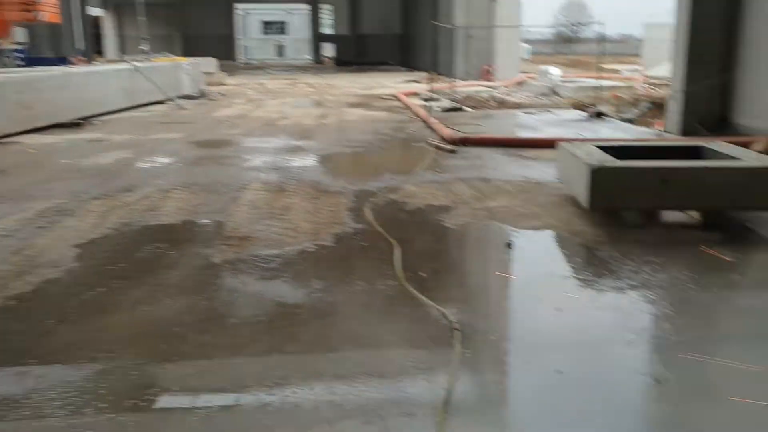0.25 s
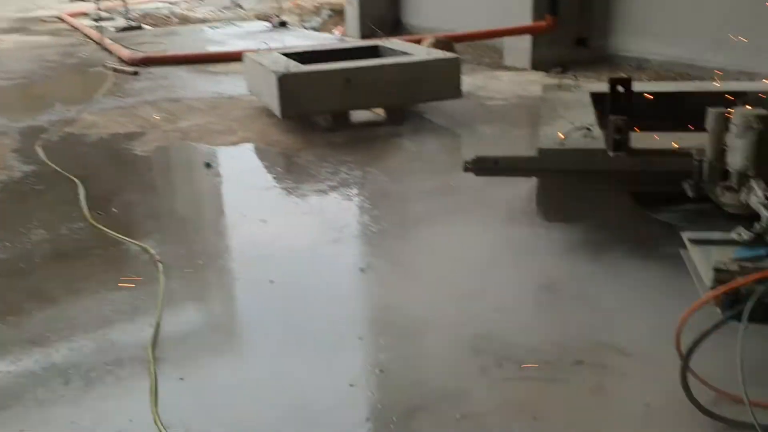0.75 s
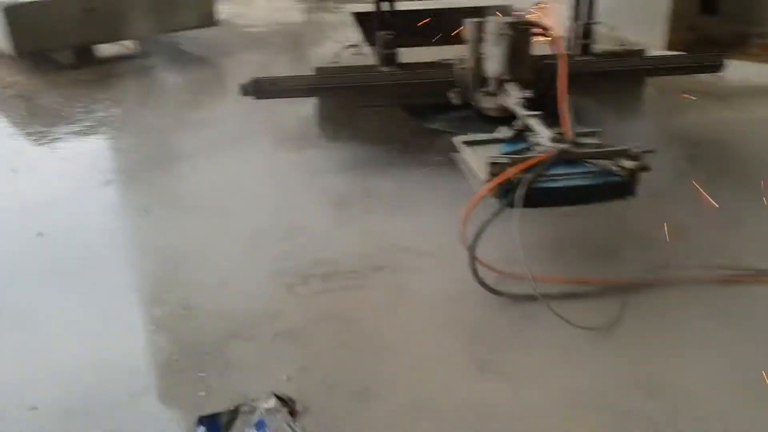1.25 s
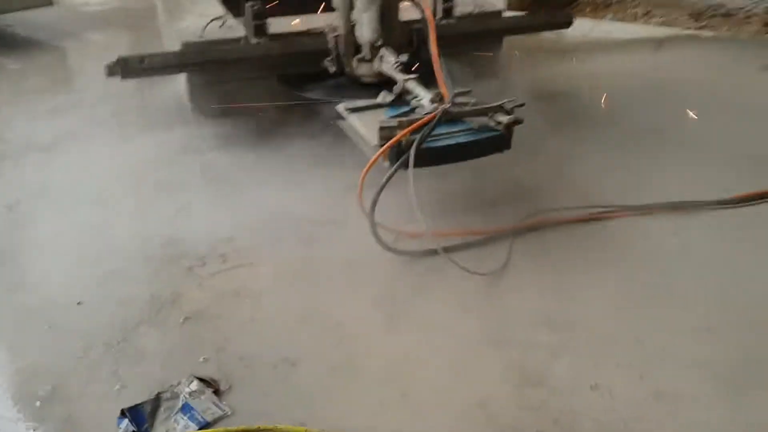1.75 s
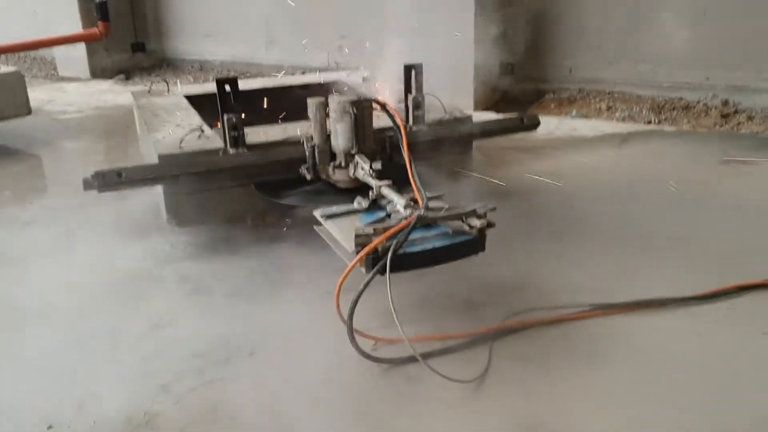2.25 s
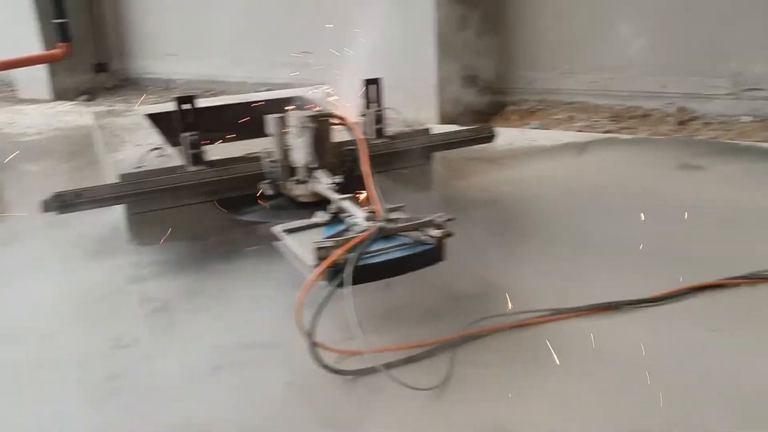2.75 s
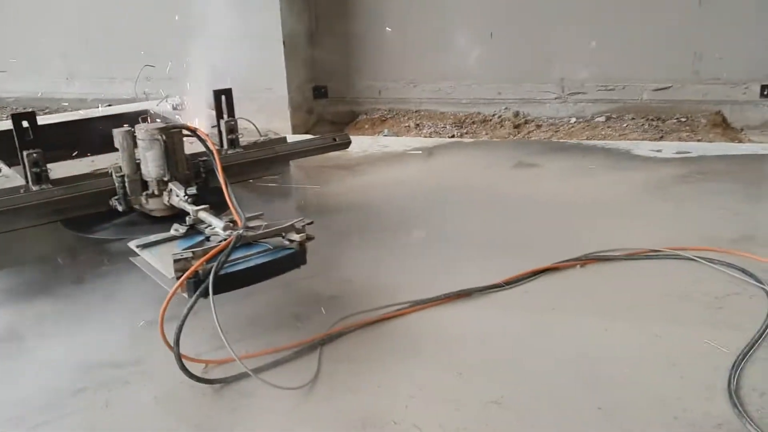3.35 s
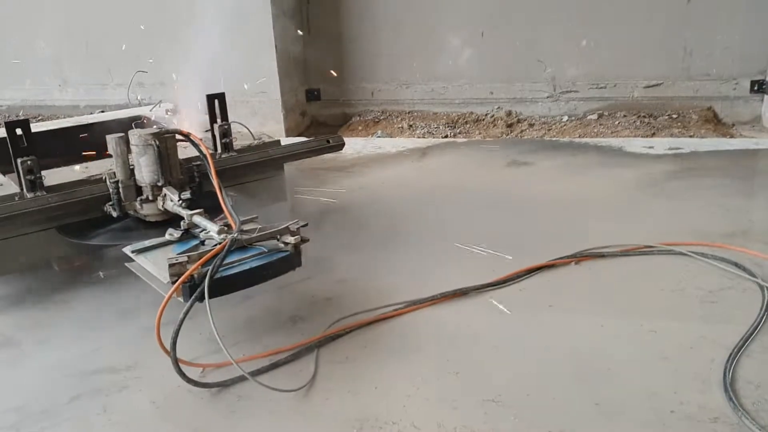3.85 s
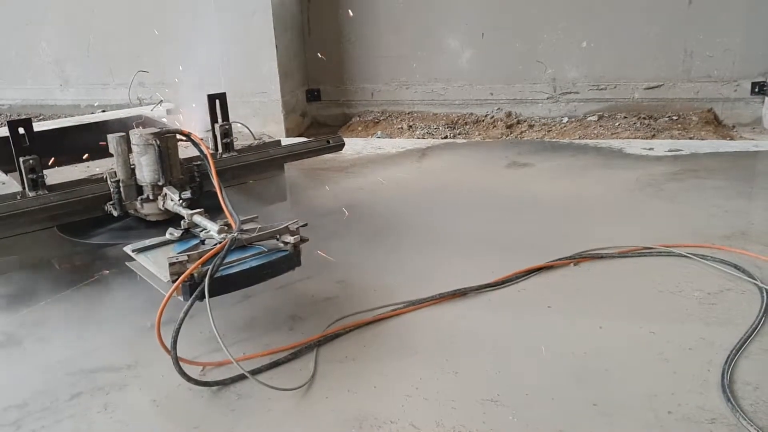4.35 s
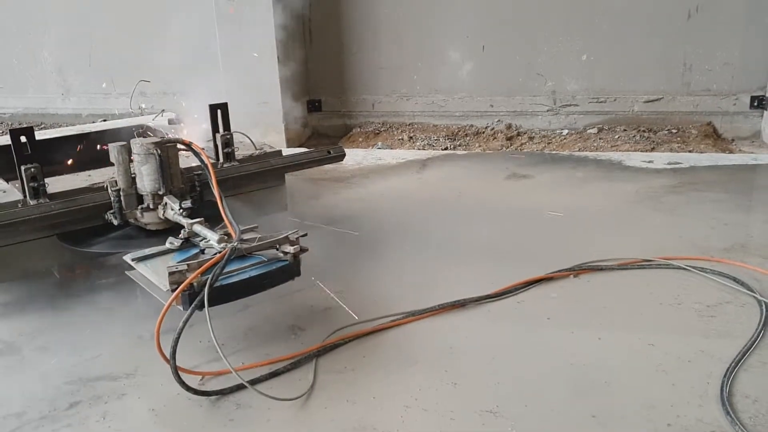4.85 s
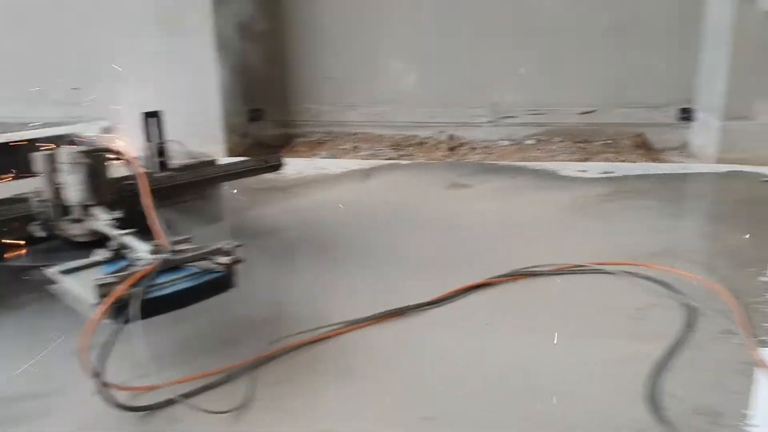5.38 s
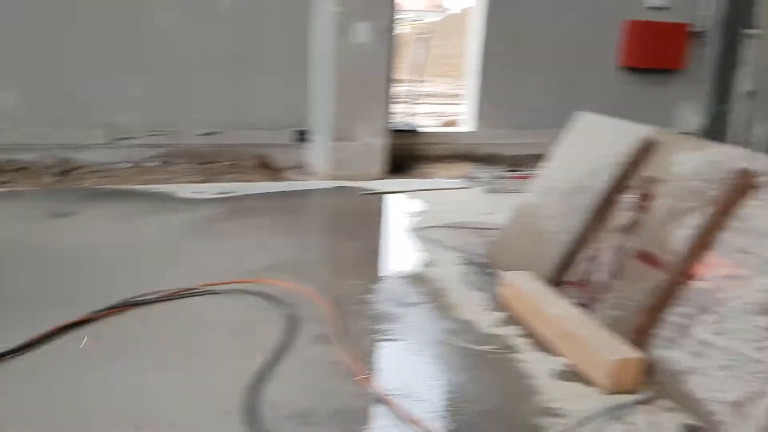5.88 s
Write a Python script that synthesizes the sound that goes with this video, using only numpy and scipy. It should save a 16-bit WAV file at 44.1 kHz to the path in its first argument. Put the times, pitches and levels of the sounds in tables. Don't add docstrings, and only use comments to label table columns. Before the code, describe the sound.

Continuous loud concrete sawing in a bare hall. Stacked steady whines from the blade and gears flutter about sixteen times a second, with a ringing steel-plate rasp, dry grit spray and a faint surging motor hum. The whine grows and fades slightly as wall echoes shift. A close hand-held stereo microphone moves past, sending the saw from the right side through the centre to the left.

```python
import sys
import numpy as np
from scipy import signal
from scipy.fft import rfft, irfft, next_fast_len
from scipy.io import wavfile
from scipy.ndimage import map_coordinates

SR = 44100
rng = np.random.default_rng(int(sys.argv[2]) if len(sys.argv) > 2 else 0)


def level_to_linear(level):
    exponent = np.asarray(level, float) / 20
    return 10 ** exponent


def dump_mix(stems):
    frames = np.atleast_2d(stems).T
    limited = np.clip(frames, -1, 1)
    pcm = np.round(limited * 32767).astype(np.int16)
    wavfile.write(sys.argv[1], SR, pcm)


N = 269892

TURN = 5375
SEGMENTS, COGS = 72, 68
SOUND_M_PER_S = 343


def unit(x):
    return x / np.sqrt(np.mean(np.abs(x) ** 2) + 1e-20)


def along(points, hz):
    f, v = np.transpose(points)
    return np.interp(np.log(hz + 1), np.log(f + 1), v)


def curves(rows, t):
    s, *cols = np.transpose(rows)
    return [np.interp(t, s, c) for c in cols]


def filtered(x, response):
    m = next_fast_len(N + 8192)
    return irfft(rfft(x, m) * response(np.fft.rfftfreq(m, 1 / SR)), m)[..., :N]


def turns():
    return np.arange(N) * 2 / TURN


def around(memory, count):
    keep = np.clip(memory, 0, .99)
    settle = 10
    fresh = rng.standard_normal((2 * N // TURN + settle + 2, count))
    worn = signal.lfilter([1], [1, -keep], fresh, axis=0)
    return unit(worn[settle:].ravel())


def rim(memory, count):
    return map_coordinates(around(memory, count), [turns() * count], order=3)


# segment harmonic, level in dB.
UPPER = [(6, -32), (7, -49), (8, -48), (9, -46), (10, -47), (11, -45), (12, -45), (13, -42)]


def segments():
    first, second, third, fourth, fifth = [k * SEGMENTS for k in range(1, 6)]
    low = tone(first, 0.34, uneven=0.28, memory=0.7, count=6, right_db=-3.5, path=heard(first))
    low += tone(second, -0.23, uneven=0.15, memory=0.57, count=6, lead=0.057, path=heard(second))
    out = swell("first") * low
    out += swell("third") * tone(third, -.2, uneven=.2, memory=.9, count=6, lead=.015, right_db=1.1,
                                 path=heard(third))
    out += swell("fourth") * tone(fourth, -.3, uneven=.2, memory=.9, count=5, lead=-.06, right_db=-.5,
                                  path=heard(fourth))
    high = tone(fifth, -.7, uneven=.35, memory=.8, count=5, lead=-.13, right_db=-1, path=heard(fifth))
    high += sum(tone(k * SEGMENTS, db, uneven=2, memory=.3, count=10) for k, db in UPPER)
    return out + swell("upper") * high


FLUTTER = {216: (.5, .04), 288: (1.1, .24), 360: (1, .35), 136: (1.15, 0)}


def tone(multiple, db, uneven, memory, count, lead=0, right_db=0, path=1):
    height, spacing = [rim(memory, count) for _ in range(2)]
    swing, at = FLUTTER.get(multiple, (0, 0))
    late = .00028 * rim(.3, count=1)
    phase = 2 * np.pi * multiple * (turns() + late) + swing * np.sin(2 * np.pi * (turns() - at))
    wave = unit(1 + uneven * (height + 1j * spacing)) * np.exp(1j * phase)
    half = level_to_linear(right_db / 2) * np.exp(1j * np.pi * lead)
    return np.sqrt(2) * level_to_linear(db) * (path * np.array([wave / half, wave * half])).imag


SWELL = {"first": (2, .95, 1.4, .47), "third": (2, .04, 3.6, .15), "fourth": (4.3, .99, 3.2, .24),
         "upper": (1.6, .1, .5, .15), "gear": (4, .5, 1.2, .32), "grind": (1.9, .98, 1.1, .17),
         "hiss": (1.4, .06, .3, .15)}


def swell(part):
    once_db, at1, twice_db, at2 = SWELL[part]
    once = once_db * np.cos(2 * np.pi * (turns() - at1))
    twice = twice_db * np.cos(4 * np.pi * (turns() - at2))
    return level_to_linear(once + twice)


# time in seconds, extra path by the side wall in metres,
# left lag of that echo in samples, extra path by the back wall in metres, bite of the rim in dB.
DRIFT = [(0.0, 0.376, 4.1, 2.102, -3.8), (0.36, 0.371, -1.6, 2.127, -1.4), (0.72, 0.38, -0.3, 2.122, -2.8),
         (1.08, 0.344, -7.4, 2.111, -1.6), (1.44, 0.335, -5.7, 2.116, 1.5), (1.8, 0.337, -2.2, 2.112, -3.3),
         (2.16, 0.318, 3.5, 2.081, -2.0), (2.52, 0.32, 1.4, 2.037, -1.2), (2.88, 0.344, -1.7, 2.073, 1.7),
         (3.24, 0.351, -0.8, 1.962, -0.4), (3.6, 0.333, 2.1, 1.961, -2.9), (3.96, 0.369, -1.7, 1.925, 0.2),
         (4.32, 0.337, 3.8, 1.913, 2.2), (4.68, 0.341, 1.8, 1.904, 2.2), (5.04, 0.343, 1.0, 1.889, 0.3),
         (5.4, 0.322, 1.1, 1.868, 1.5), (5.76, 0.292, 0.9, 1.848, 3.3), (6.12, 0.293, 2.0, 1.851, 6.5)]
# order of the turn, level in dB, dB per dB of bite.
DIRECT = [(72.0, -40.9, 0.49), (144.0, -39.9, 1.37), (216.0, -22.6, 1.18), (288.0, -24.3, 0.65),
          (360.0, -32.7, -1.43), (68.0, -42.3, -0.61), (136.0, -32.6, -0.2)]
ECHOES = [(72.0, 0.24, 0.45, 0.42, 0.51), (144.0, 0.11, 0.75, 0.15, 0.38), (216.0, 0.33, 0.45, 0.28, 0.34),
          (288.0, 0.37, 0.41, 0.44, 0.16), (360.0, 0.27, 0.02, 0.2, 0.05), (68.0, 0.54, 0.28, 0.23, 0.07),
          (136.0, 0.09, 0.49, 0.21, 0.61)]


def heard(multiple, count=32):
    side_m, skew, back_m, bite_db = curves(DRIFT, np.arange(0, N, count) / SR)
    db, follows = next(row[1:] for row in DIRECT if row[0] == multiple)
    side, side_cycles, back, back_cycles = next(row[1:] for row in ECHOES if row[0] == multiple)
    line_hz = multiple * 2 * SR / TURN

    def echo(late_s, cycles):
        return np.exp(2j * np.pi * (line_hz * late_s + cycles))

    side_s = side_m / SOUND_M_PER_S + np.array([[-1], [1]]) * skew / SR / 2
    both = side * echo(side_s, side_cycles) + back * echo(back_m / SOUND_M_PER_S, back_cycles)
    gain = level_to_linear(db + follows * bite_db) * (1 + both)
    return np.repeat(gain, count, axis=1)[:, :N]


# centre in Hz, width in Hz,
# lift in dB.
PLATE = [(3170, 50, 4), (3270, 50, 4), (3370, 60, 3.5), (3595, 80, 5), (3715, 50, 2), (3925, 40, 3),
         (4355, 80, 3), (4665, 90, 5), (5020, 60, 3), (5115, 60, 3)]
# frequency in Hz, level in dB per Hz.
BLADE = [(700, -32.5), (1300, -27), (1900, -21.5), (2250, -7.5), (2800, -9.5), (3150, -2), (3650, -0.2),
         (4050, -6), (4400, 0), (5100, -3), (5500, -14.5), (6900, -9), (8000, -25.5), (12000, -31)]
# frequency in Hz, level in dB per Hz.
GRIT = [(1500, -31), (4000, -7.5), (6000, -1.5), (7200, -15), (8000, -51), (9000, -34), (15600, -34)]
# frequency in Hz, level in dB per Hz.
SPRAY = [(5000, -36), (7000, -11.5), (8800, -27), (10000, -20), (14000, -19), (14800, -20.5),
         (15600, -19.5)]
# time in seconds, feed pressure in dB, dryness of the grit from -1 to 1.
CUT = [(0, 1.5, 1), (.25, 1, 0.69), (.55, 1.6, 0.036), (.85, 1.34, 0.33), (1.2, 1.85, -0.28),
       (1.65, 1.1, -0.77), (2.2, 1.5, -0.48), (2.7, 1.7, -0.15), (3.2, 0.9, -0.41), (3.6, 1.5, 0.011),
       (3.9, 0.57, -0.085), (4.7, 0.55, -0.21), (5.1, 0.5, 0.052), (5.5, 1.06, .2), (5.85, 0.2, 0.29),
       (6.12, -0.5, -0.23)]
CUT_HZ = [2600, 3500, 4800, 6500, 11000]
# dB per dB of pressure, dB per unit of dryness.
CUT_FOLLOWS = [(-0.5, 0.5), (2.66, -3), (1.5, -0.4), (1.2, 4.7), (1, -1.5)]


def cut():
    def modes(hz):
        return level_to_linear(sum(db / (1 + (2 * (hz - centre_hz) / width) ** 2) for centre_hz, width, db in PLATE))

    plate = filtered(grinding(BLADE, -20.5, memory=0.54), modes)
    spray = np.array([grinding(SPRAY, -26, memory=0.056) for _ in "LR"])
    grit = grinding(GRIT, -23.5, memory=0.14) + spray
    worn = patchy(.85, memory=.85, count=9)
    stones = patchy(.55, memory=.6, count=1)
    rasp = swell("grind") * plate + swell("hiss") * worn * stones * grit

    hz, t, z = signal.stft(rasp, SR, nperseg=512)
    load_db = np.array(CUT_FOLLOWS) @ curves(CUT, t)
    shares = np.array([np.interp(hz, CUT_HZ, row) for row in np.eye(len(CUT_HZ))])
    return signal.istft(z * level_to_linear(shares.T @ load_db), SR, nperseg=512)[1][:, :N]


def grinding(spectrum, db, memory):
    rasp = signal.resample_poly(around(memory, count=TURN), 1, 2)[:N]
    return level_to_linear(db) * unit(filtered(rasp, lambda hz: level_to_linear(along(spectrum, hz))))


def patchy(depth_db, memory, count):
    return level_to_linear(depth_db * rim(memory, count))


def drive():
    gear = tone(COGS, 0.34, uneven=0.19, memory=0.97, count=4, right_db=-0.5, path=heard(COGS))
    gear += swell("gear") * tone(2 * COGS, -.5, uneven=.14, memory=.8, count=6, lead=.05, right_db=-.8,
                                 path=heard(2 * COGS))
    return gear + np.sqrt(2) * (frame_hum() + pump())


# order of the turn, level in dB rms.
SHAFT = [(9, -57.5), (10, -68.5), (11, -59.5), (12, -57), (13, -60.5), (14, -63.5), (15, -68), (19, -78),
         (25, -65.5), (27, -80), (28, -82), (29, -60.5), (30, -61), (31, -62), (32, -102), (37, -132),
         (39, -67), (42, -86), (45, -60.5), (48, -56)]


def frame_hum():
    scatter = 0.9 * rng.standard_normal(len(SHAFT))
    angle = 2 * np.pi * (turns() - .86)
    return sum(level_to_linear(db) * np.cos(round(k) * angle + s) for (k, db), s in zip(SHAFT, scatter))


# middle in seconds, length in seconds, level in dB.
PUMP = [(0, 0.6, -58), (0.964, 0.27, -50.5), (2.223, 0.057, -52), (2.59, 0.085, -44.5), (2.92, 0.15, -49),
        (3.397, .3, -56), (3.663, 0.063, -50), (4.138, 0.34, -56), (4.39, 0.064, -53), (4.9, 0.65, -52.5),
        (5.194, 0.19, -53), (5.66, 0.55, -54)]


def pump():
    start_hz, sag_hz_per_s, waver_hz, idle_db = 395.3, 2.2, 3.4, -59.5
    t = np.arange(N) / SR
    waver = map_coordinates(rng.standard_normal(80), [12 * t])
    hz = start_hz - sag_hz_per_s * t + waver_hz * waver
    level = level_to_linear(idle_db)
    level = level + sum(level_to_linear(db) * np.exp(-(2 * (t - s) / length) ** 2) for s, length, db in PUMP)
    return level * np.sin(2 * np.pi * np.cumsum(hz) / SR)


# frequency in Hz, level in dB per Hz.
RUMBLE = [(30, -32), (100, -60), (170, -38), (300, -38), (550, -37), (800, -22.5), (1500, -17.5),
          (3000, -42.5)]


def rumble():
    return grinding(RUMBLE, -40.5, memory=0.26)


# frequency in Hz, right over left in dB.
RIGHT = [(500, -2.2), (1500, -1.5), (2500, -0.5), (4500, 1), (12000, 0.8)]
# frequency in Hz, lead of the right port in cycles.
SKEW = [(1200, .03), (1900, .08), (2550, .11), (3100, -.01), (3500, .02), (5100, .03), (6000, -.17),
        (6900, .03)]


def around_case(x):
    sides = np.array([[-1], [1]])

    def response(hz):
        return level_to_linear(along(RIGHT, hz) / 2 * sides) * np.exp(1j * np.pi * along(SKEW, hz) * sides)

    return filtered(x, response)


# time in seconds, lag of the left port in samples.
AIM = [(0, 17), (.3, 15.5), (.6, 11.2), (1, 5.4), (1.5, .4), (2, -1.6), (2.5, -1.5), (2.8, -3),
       (3.25, -6.6), (5, -6.8), (5.4, -8.7), (5.6, -11), (6, -17), (6.12, -17.8)]


def ports(x):
    hz, t, z = signal.stft(x, SR, nperseg=512)
    lag, = curves(AIM, t)
    right_db = 0.12 * lag * np.clip(hz / 7000, 0, 1)[:, None]
    half = level_to_linear(right_db / 2) * np.exp(1j * np.pi * hz[:, None] * lag / SR)
    return signal.istft(z * np.array([1 / half, half]), SR, nperseg=512)[1][:, :N]


# frequency in Hz, time to fall 60 dB in seconds.
HALL = [(150, 0.47), (1500, 1), (6000, 1), (10000, 0.049)]
# frequency in Hz, hall over direct in dB.
WET = [(100, -3), (650, 1.5), (1400, -2.5), (2500, -4.5), (3250, -7), (4000, -3.5), (5800, -2), (7500, .5)]


def hall(x, count=16384):
    ports_m = .135
    out, fade = np.zeros((2, N + 4 * count)), np.hanning(2 * count)
    padded = np.concatenate([x[:3 * count][::-1], x, np.zeros(2 * count)])
    for start in range(-count, N, count):
        hz, t, z = signal.stft(rng.standard_normal((2, 2 * count)), SR, nperseg=512)
        alike = np.sinc(2 * hz * ports_m / SOUND_M_PER_S)
        turn = np.arccos(alike)[:, None] / 2
        mid, side = z[0] * np.cos(turn), z[1] * np.sin(turn)
        dying = level_to_linear(-60 * t / along(HALL, hz)[:, None])
        dying *= level_to_linear(along(WET, hz))[:, None] / np.linalg.norm(dying, axis=1, keepdims=True)
        tail = signal.istft(np.array([mid + side, mid - side]) * dying, SR, nperseg=512)[1]
        tail = tail[:, :2 * count] / 16
        heard_part = padded[None, start + count:start + 5 * count - 1]
        wet = signal.fftconvolve(heard_part, tail, "valid", axes=1)
        out[:, start + count:start + 3 * count] += np.sqrt(fade) * wet
    return out[:, count:count + N]


# frequency in Hz, level in dB per Hz.
AIR = [(25, -20), (50, 13), (100, -7), (250, -10), (600, -12)]


def handling_air():
    noise = rng.standard_normal((2, N))
    return level_to_linear(-56) * unit(filtered(noise, lambda hz: level_to_linear(along(AIR, hz))))


def scene():
    whine = segments() + drive()
    rasp = cut() + rumble()
    direct = ports(whine + around_case(rasp))
    echo = hall(rasp[0] + level_to_linear(-12) * whine[0])
    return direct + echo + handling_air()


def top_cut(x):
    return signal.sosfilt(signal.butter(12, 16520, fs=SR, output="sos"), x)


def record(dry):
    low_hz, top_hz = 46, 15740
    x = dry / (1 + np.abs(dry) ** 8) ** (1 / 8)
    x = filtered(x, lambda hz: hz ** 2 / (hz ** 2 + low_hz ** 2) * (hz < top_hz))
    return top_cut(x)


dry = scene()
out = record(dry)
dump_mix(out)
```